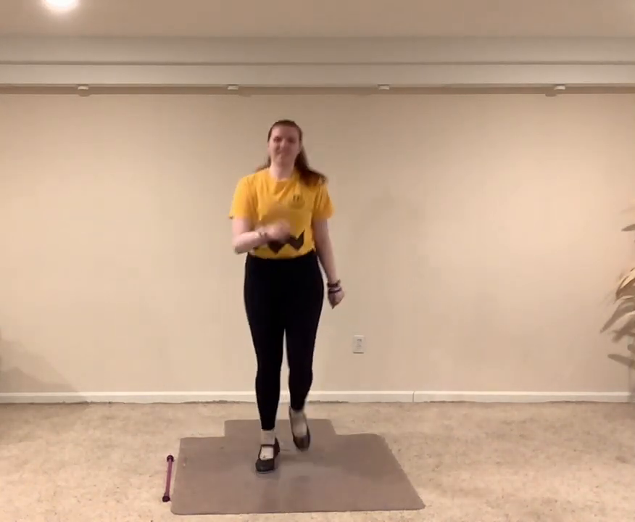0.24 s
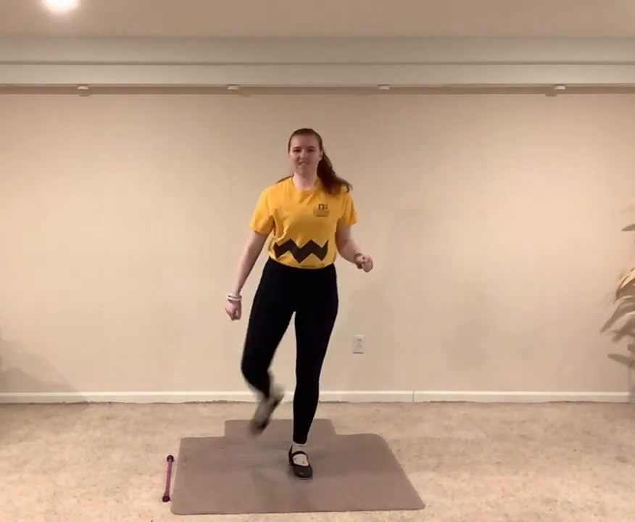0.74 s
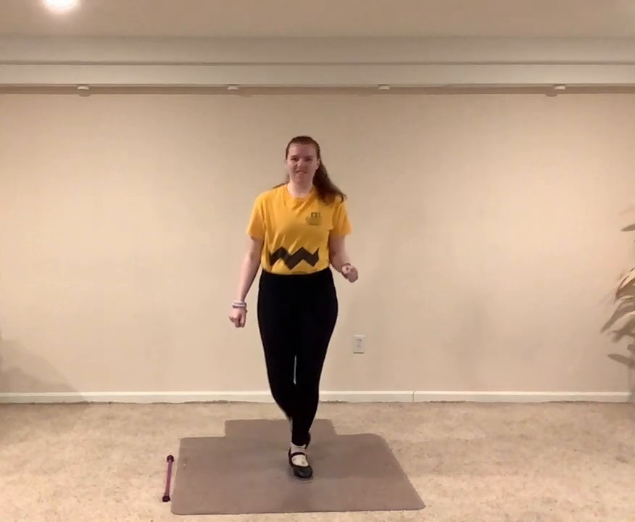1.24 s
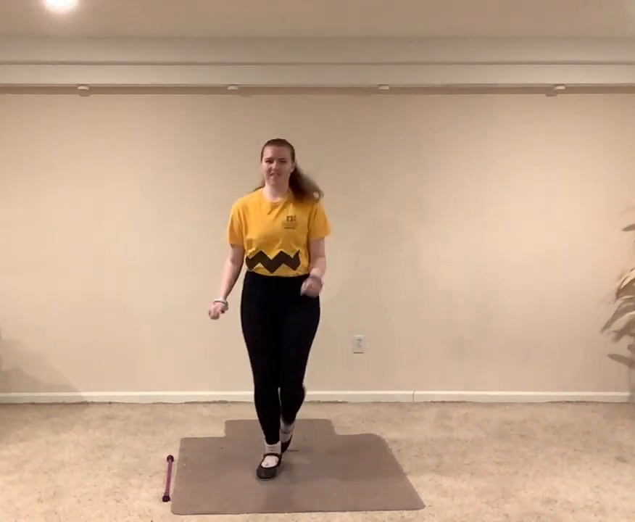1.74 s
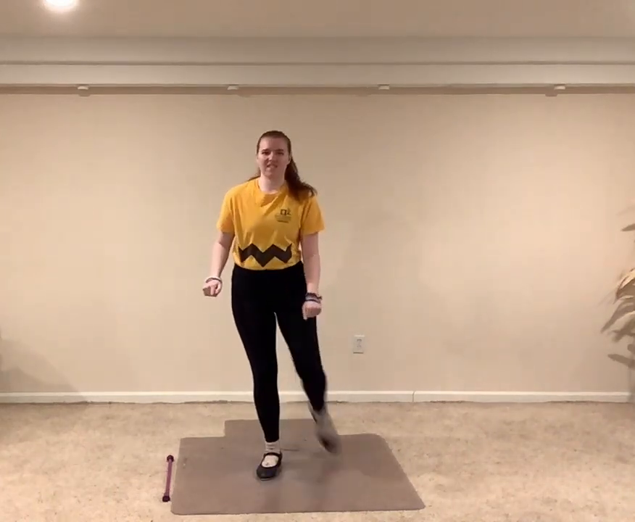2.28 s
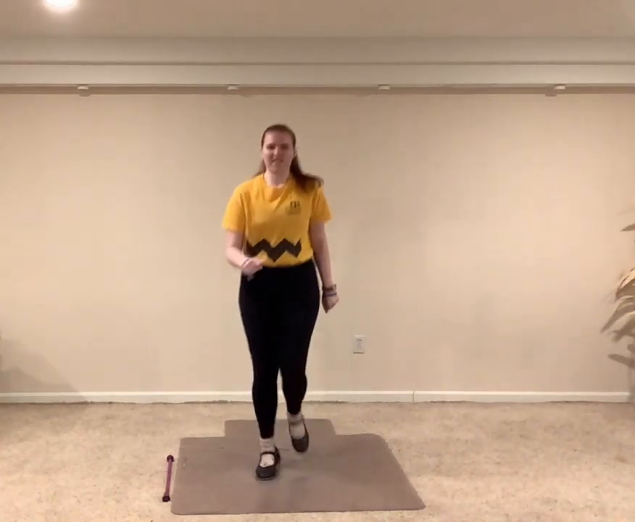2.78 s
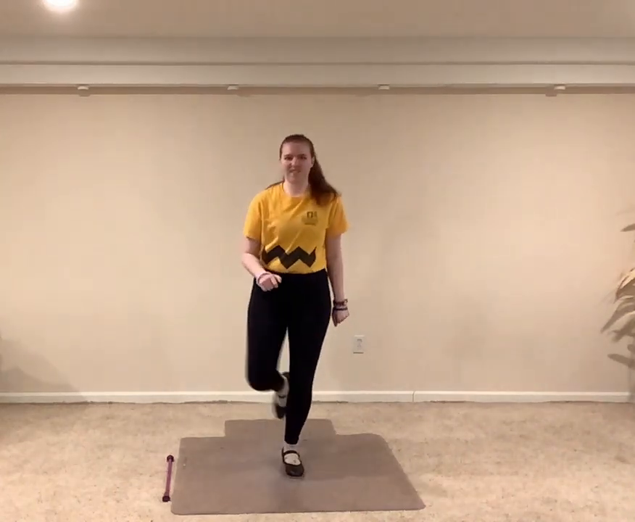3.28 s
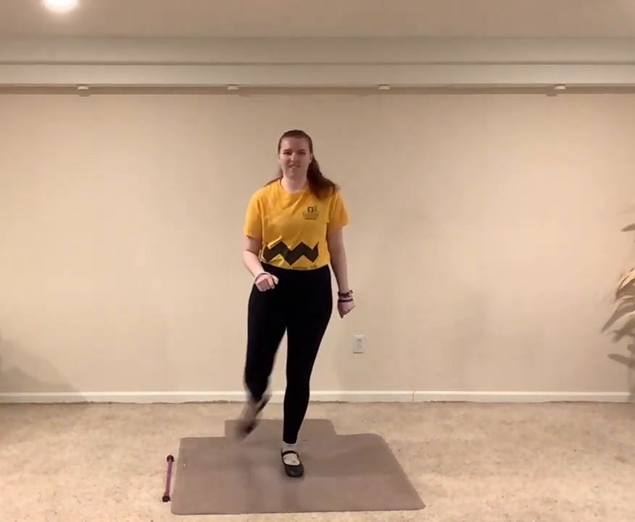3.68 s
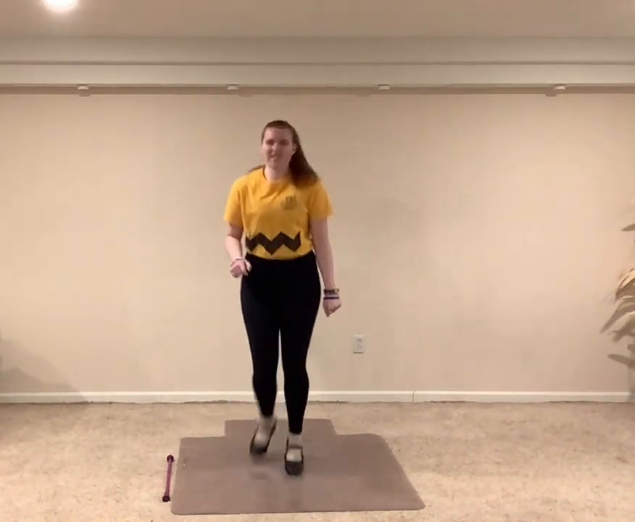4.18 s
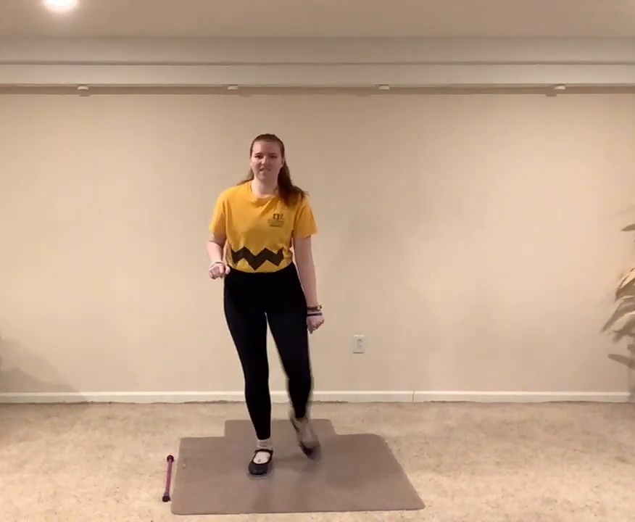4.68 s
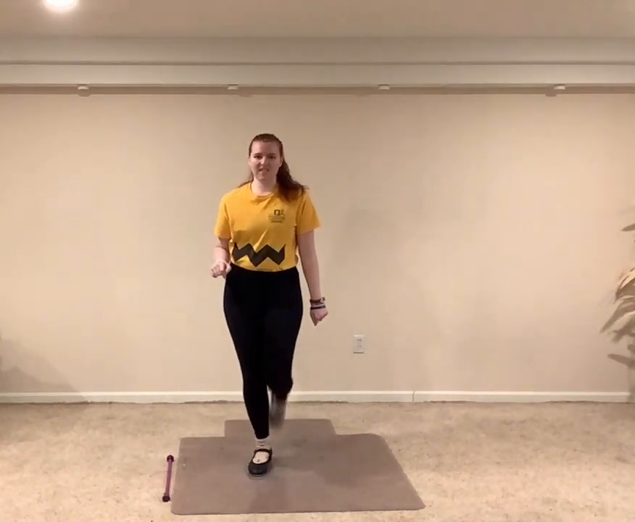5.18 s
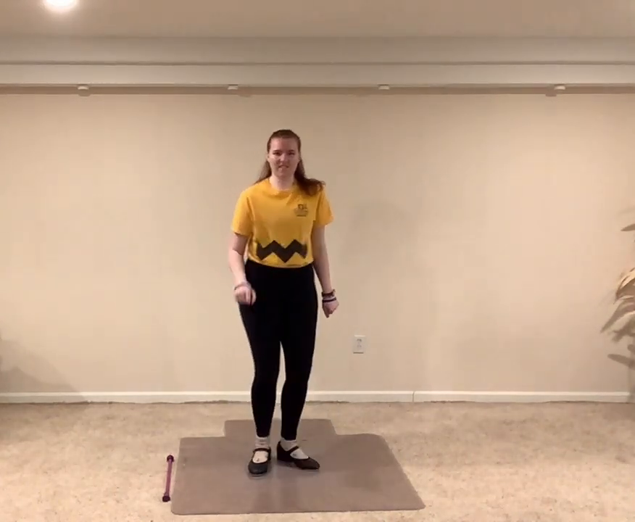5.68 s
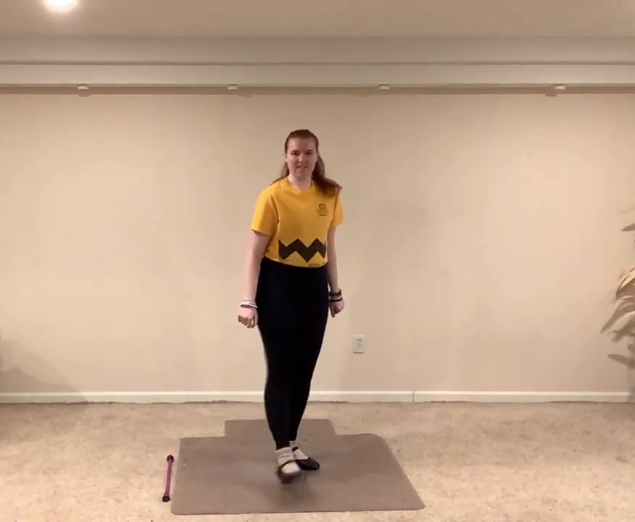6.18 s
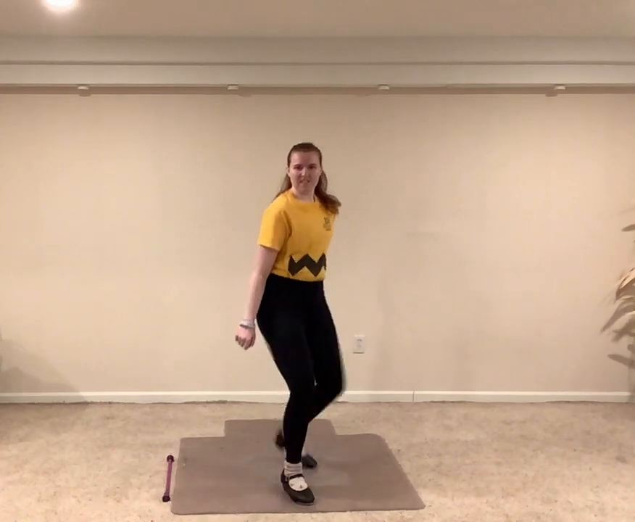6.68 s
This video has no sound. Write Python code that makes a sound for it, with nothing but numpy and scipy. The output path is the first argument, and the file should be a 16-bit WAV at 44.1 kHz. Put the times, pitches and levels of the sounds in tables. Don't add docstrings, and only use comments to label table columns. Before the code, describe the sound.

Metal toe and heel plates tap a hard plastic mat over carpet. A landing thump starts it, then quick runs of taps, brushes and soft heel clicks alternate with heavier steps and hops. Later the blows space out, a bright hard dig rings out, and a heavy double-edged stamp closes. Bare low room with dense short echoes; a small microphone a few metres away.

```python
import sys
import numpy as np
from scipy import signal
from scipy.fft import rfft, irfft
from scipy.io import wavfile
from scipy.ndimage import uniform_filter1d

SR = 44100
rng = np.random.default_rng(int(sys.argv[2]) if len(sys.argv) > 2 else 0)


def wrap_up_sound(samples):
    columns = np.atleast_2d(samples).T
    tamed = np.clip(columns, -1, 1)
    steps = np.round(tamed * 32767).astype(np.int16)
    wavfile.write(sys.argv[1], SR, steps)


def undo_db(level):
    steps = np.asarray(level, float) / 20
    return 10 ** steps


N = 306054

# delay_s, treble_db, bass_db, sign, scatter_s
EARLY_BOUNCES = [(.0023, 3, 2.5, -0.27, 0.000085), (.0038, -12, -23, -0.98, 0.00031),
                 (.0053, 1.5, -3, 0.73, 0.00058), (.0067, -1.5, -8, 0.97, 0.0006),
                 (.008, -2.5, -12, 0.59, .0006), (.0095, -2, -1, 1, 0.00041), (0.012, 3, -3, -0.22, 0.0013),
                 (0.0103, -6.5, -13.5, -1, .0005), (0.0135, 1.5, -1.5, -1.8, 0.00027),
                 (0.0157, -9, 8.5, 0.58, 0.00083), (0.0182, -9.5, 3, -0.61, 0.00041),
                 (0.024, -5.5, -5, 1, 0.0004), (.031, -8, 8, 0.52, 0.00041)]
# band_hz, t60_s
TAIL_DECAY = [(60, 0.55), (160, 0.38), (420, 0.35), (1100, 0.32), (2900, 0.35), (7700, 0.3), (14000, 0.19)]
# band_hz, level_db
TAIL_COLOUR = [(60, 15), (200, 12), (600, 9), (2000, 9), (6000, 11.5), (15000, 10.5)]
# pitch_hz, t60_s, level_db
ROOM_MODES = [(157, 0.55, -14), (189.7, 0.21, -1.5), (224.5, 0.42, -0.5), (247, 0.47, -8),
              (308.7, 0.48, -12), (408, 0.26, 2)]
# band_hz, level_db_per_hz
BRUSH_COLOUR = [(240, -42.5), (400, -1.5), (1900, -14), (2840, -8), (3650, -10.5), (14100, -13.5),
                (15700, -16), (16500, -30.5)]
# band_hz, level_db_per_hz
AIR_COLOUR = [(30, -19), (70, -4), (230, -1), (400, -19.5), (800, -24), (3000, -24), (9000, -28),
              (16000, -26.5)]
# band_hz, level_db
OVERALL_RESPONSE = [(20, -33.5), (45, -13.5), (62, -14), (80, -0.5), (100, 1.5), (15000, -0.5), (16300, -18.5),
                    (17000, -40.5)]
# share_of_slap_pitch, level_db
SLAP_SHAPE = [(.15, -31), (.5, -11.5), (.75, -5.5), (1.05, -4), (1.65, -8), (2.2, -14), (6, -40.5)]
# pitch_hz, t60_s, level_db
FLOOR_SLAB = [(83.4, 0.34, 1), (106.8, 0.52, -5), (123.5, 0.28, -2.5)]
# knock_1khz_db, crack_2500hz_db, edge_11khz_db, later_reflections_db
BLOW_COLOUR = [(4.5, 0, -1.2, 1), (4, 2, -0.9, 0.3), (5.5, 2, -0.5, -1.1), (5.5, 4, 0.8, 0.43),
               (-1, 4.5, -1, 3.2), (14.5, 8, -2.5, -2), (7.5, 2, 1, -6), (5, 7.5, 2, -2.5),
               (2, 3.5, 0.6, 1.7), (12, 6.5, -2.5, -2)]
# first_hz, first_db, second_hz, second_db
PLATE_RINGS = [(2797, 6, 19000, 7.5), (2780, 5.5, 3750, 6.5), (5290, 4, 8600, 5.5), (1229, 3.5, 2400, 0),
               (2744, 4.5, 1250, 5.5), (1720, 7, 3600, 8), (5600, 1.5, 10400, 5.5), (2200, 0, 5200, 5),
               (1727, 6.5, 9300, 5), (1720, 5.5, 3100, 8)]
# swish_s, swish_db, landing_s, scrape_db
FOOT_SWINGS = [
    (.185, -65, .325, -66),
    (1.462, -68.5, 1.574, -65.5),
    (2.78, -67, 2.888, -70.5),
    (4.13, -70, 4.228, -69),
]
# start_s, level_db
BUCKLE_PINGS = [
    (1.089, -62),
    (1.722, -48),
    (1.911, -65),
    (5.14, -75),
    (6.01, -78),
]

# start_s, tick_db, slap_db, slap_pitch_hz, thud_db
TOE_TAP = [
    (0.3311, -7.5, -12, 217, -17),
    (0.8027, -4.5, -11, 267, -19.5),
    (2.8944, -10.5, -16, 227.4, -22),
    (3.443, -7.5, -12, 269, -19.5),
    (3.5935, -5, -14.5, 220, -16),
    (5.6069, -9, -15, 255.5, -14),
    (6.1, -3.5, -6.5, 218.3, -13.5),
]
BRUSH_OUT = [
    (0.4509, -6, -12, 219, -11),
    (1.5798, -4, -14, 275, -34),
    (4.2336, -5.5, -13, 234, -20.5),
]
BRUSH_BACK = [
    (0.9542, -6, -17, 316, -26),
    (2.2065, -3.5, -11, 238, -19.5),
    (4.8967, -4, -12, 232, -15.5),
]
STEP = [
    (1.25, -15, -14, 243, -8),
    (1.7456, -6.5, -9.5, 267, -2),
    (2.0292, -11, -13.5, 240, -12.5),
    (2.5367, -5, -7, 255, -.6),
    (4.4221, -8, -4.5, 250, -0.8),
    (4.7035, -12, -13, 263, -10.5),
]
HOP = [
    (3.0995, -7, -4.5, 271, -4),
    (3.9004, -8, -3, 257, -9.5),
]
HEEL_DROP = [
    (0.4014, -18.5, -19.5, 282, -18),
    (1.638, -17, -20.5, 300, -19),
    (2.9711, -25.5, -19.5, 249, -35),
    (4.3001, -28.5, -17.5, 264, -23),
]
DIG = [
    (5.2366, -3, -10.5, 237, 0),
    (6.2399, 4.5, -15, 323, -12.5),
]
STAMP = [
    (6.601, 2.8, -4.5, 206.6, -28.5),
    (6.613, 3.3, -1.5, 273.4, 4.5),
]
LANDING = [
    (.0005, -5.5, -1.5, 239.4, 1.6),
]
HEEL_CLACK = [
    (5.6463, -16, -19, 264, -19),
    (6.1265, -9.5, -10, 190.7, -11),
]


def evened(x):
    return x / np.sqrt(np.mean(x ** 2) + 1e-20)


def read(points, hz):
    f, value = np.transpose(points)
    return np.interp(np.log(hz + 1), np.log(f + 1), value)


def add(mix, s, sound):
    part = mix[max(round(s * SR), 0):][:len(sound)]
    part += sound[:len(part)]


def coloured(points, count):
    z = rfft(rng.standard_normal(count))
    gain = undo_db(read(points, np.fft.rfftfreq(count, 1 / SR)))
    return evened(irfft(z * gain, count))


def ring(hz, t60, count=1500):
    t = np.arange(count) / SR
    return np.sin(2 * np.pi * hz * t) * undo_db(-60 * t / t60)


def causal(points, peaks=(), count=8192):
    hz = abs(np.fft.fftfreq(count, 1 / SR))
    db = read(points, hz)
    for peak_hz, lift_db in peaks:
        db = db + min(lift_db, 9) * np.exp(-(np.log((hz + 1) / peak_hz) / .12) ** 2)
    spectrum = np.exp(np.conj(signal.hilbert(np.log(undo_db(db)))))
    return np.fft.ifft(spectrum).real[:count // 2]


def still_air():
    return undo_db(-73) * coloured(AIR_COLOUR, count=N)


def mat_slap(slap_db, slap_hz):
    focus = 1 + 0.025 * (slap_db + 11.5)
    shape = [(slap_hz * ratio, db * focus) for ratio, db in SLAP_SHAPE]
    return undo_db(slap_db + 26) * causal(shape, count=10000)


def plate_tick(knock_db, crack_db, edge_db, rings):
    shape = [(250, knock_db - 19.5), (600, knock_db), (1100, knock_db), (2600, crack_db),
             (5000, 0.12), (7000, 0.38), (11000, edge_db), (15000, edge_db + .3)]
    return causal(shape, np.reshape(rings, (2, 2)), count=2048)


def weight_thud(thud_db, count):
    hum = sum(undo_db(db) * ring(hz, t60, count=count) for hz, t60, db in FLOOR_SLAB)
    sink_s = 0.009
    return hum * undo_db(thud_db - 25.0) * (1 - np.exp(-np.arange(count) / SR / sink_s))


def room_tail(count=26000):
    s = np.arange(count) / SR
    crowding = np.clip(s * 20, .15, 1)
    taps = rng.standard_normal(count) * (rng.random(count) < crowding)
    hz, t, z = signal.stft(evened(taps), SR, nperseg=256)
    t60 = read(TAIL_DECAY, hz)[:, None]
    fade_db = read(TAIL_COLOUR, hz)[:, None] - 60 * t / t60
    z = z * undo_db(fade_db) / np.sqrt(t60 * SR / (2 * np.log(1000)))
    patches = uniform_filter1d(rng.standard_normal(z.shape), size=5, axis=0)
    patches = uniform_filter1d(patches, size=3, axis=1)
    z *= undo_db(2.0 * evened(patches))
    near = undo_db(6 / (1 + np.exp((s - .019) / 0.0017)))
    onset = np.clip((s - .001) / 0.0021, 0, 1)
    return signal.istft(z, SR, nperseg=256)[1][:count] * near * onset


def standing_waves(count=26000):
    waves = sum(undo_db(db) * ring(hz, t60, count=count) for hz, t60, db in ROOM_MODES)
    build_s = 0.09
    return 0.013 * waves * np.clip(np.arange(count) / SR / build_s, 0, 1)


def bounces(late_db, front_hz, chance, room):
    delay, treble_db, bass_db, sign, scatter = np.transpose(EARLY_BOUNCES)
    count = len(delay)
    at = np.round((delay + scatter * chance[:count]) * SR).astype(int)
    bright = undo_db(late_db) * room_tail()
    low = 0.66 * room_tail() + 0.67 * room
    low[0] = 0.65
    low[at] += sign * undo_db(bass_db)

    blurs = rng.standard_normal((count + 1, 40)) * undo_db(-60 * np.arange(40) / SR / 0.0017)
    blurs[:, 0] += np.sign(np.r_[1, sign]) * (np.r_[0, delay] < .005)
    blurs /= np.linalg.norm(blurs, axis=1, keepdims=True)
    size = undo_db(treble_db + late_db * (delay > .005) + 1.2 * chance[-count:])
    for start, gain, blur in zip(np.r_[0, at], np.r_[1, size], blurs):
        add(bright, start / SR, gain * blur)
    add(bright, 0, undo_db(-17) * ring(front_hz, 0.0019, count=400))
    return bright, low


def strike(blow, colour, rings, chance, room):
    s, tick_db, slap_db, slap_hz, thud_db = blow
    knock_db, crack_db, edge_db, late_db = colour
    knock_db += 0.48 * (slap_db - tick_db) + 0.038 * (thud_db + 14)
    crack_db += 0.26 * (slap_db - tick_db)
    tick = plate_tick(knock_db, crack_db, edge_db, rings)
    slap = mat_slap(slap_db, slap_hz)
    thud = weight_thud(thud_db, len(room))
    bright, low = bounces(late_db, rings[0], chance, room)
    heard_tick = undo_db(tick_db - 1.5) * signal.fftconvolve(tick, bright)[:len(room)]
    heard_slap = signal.fftconvolve(slap, low)[:len(room)]
    return s, heard_tick + heard_slap + thud


def sole_brushes():
    swish_rise, swish_fall, scrape_rise = 900, 506, 700
    scrape_s = 0.044
    out = np.zeros(N)
    grit_db = 2.0 * np.minimum(rng.exponential(1, N), 4)
    hiss = coloured(BRUSH_COLOUR, count=N) * undo_db(grit_db)
    for swish_s, swish_db, land_s, scrape_db in FOOT_SWINGS:
        t = np.arange(swish_s - .05, land_s + .06, 1 / SR)
        slope = np.where(t < swish_s, swish_rise, swish_fall)
        swish = undo_db(swish_db - slope * abs(t - swish_s))
        scrape = undo_db(scrape_db - scrape_rise * np.maximum(land_s - scrape_s - t, 0))
        rub = evened(hiss[round(t[0] * SR):][:len(t)])
        add(out, t[0], undo_db(9.5) * (swish + scrape) * rub * signal.windows.tukey(len(t), .1))
    return out


def buckle_chimes():
    out = np.zeros(N)
    for s, db in BUCKLE_PINGS:
        chime = ring(14180, .08, count=6000)
        chime += .5 * ring(14330, .05, count=6000)
        chime += 0.42 * ring(14600, 0.036, count=6000)
        echo = signal.fftconvolve(chime, room_tail())[:6000]
        add(out, s, undo_db(db) * (chime + .5 * echo))
    return out


def scene():
    mix = still_air() + sole_brushes() + buckle_chimes()
    room = room_tail() + standing_waves()
    kinds = [TOE_TAP, BRUSH_OUT, BRUSH_BACK, STEP, HOP, HEEL_DROP, DIG, STAMP, LANDING, HEEL_CLACK]
    blows = []
    for table, colour, rings in zip(kinds, BLOW_COLOUR, PLATE_RINGS):
        blows += [(blow, colour, rings) for blow in table]
    blows.sort()
    chances = np.clip(rng.standard_normal((len(blows), 30)), -2, 2)
    for blow, chance in zip(blows, chances):
        add(mix, *strike(*blow, chance, room))
    return mix[None]


def roll_off(x):
    return signal.sosfilt(signal.butter(12, 16970, fs=SR, output="sos"), x)


def record(dry):
    x = signal.oaconvolve(dry[0], causal(OVERALL_RESPONSE))[:N]
    before = np.arange(900) / SR
    smear = rng.standard_normal(900) * undo_db(-48 - 60 * before / .055)
    smear = signal.lfilter([1, -.95], [1, -.45], smear)
    x = x + signal.oaconvolve(x[::-1], smear)[:N][::-1]
    lowpass = signal.firwin(1023, 15850, window=("kaiser", 8), fs=SR)
    low = signal.oaconvolve(x, lowpass, "same")
    power = uniform_filter1d(np.diff(x, prepend=0) ** 2, size=128)
    attack = power > 60 * np.r_[np.ones(400), power[:-400]]
    kept = np.clip(3 * uniform_filter1d(1. * attack, size=200), 0, 1)
    x = low + kept * (x - low)
    loud = 1.059 * np.tanh(x / 1.048)
    return roll_off(loud[None])


dry = scene()
out = record(dry)
wrap_up_sound(out)
```